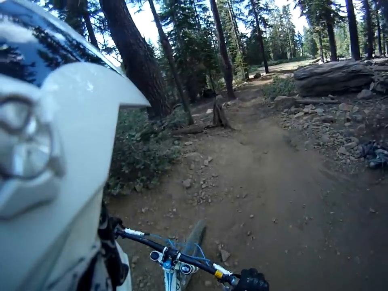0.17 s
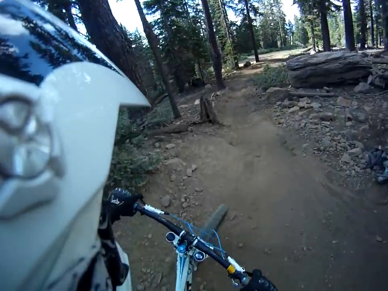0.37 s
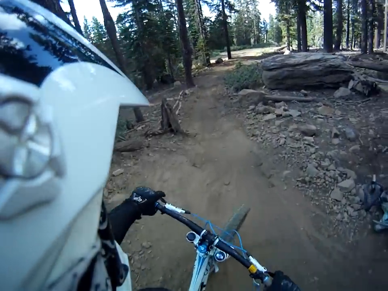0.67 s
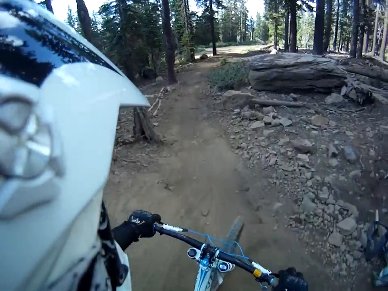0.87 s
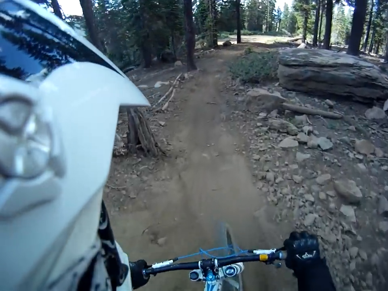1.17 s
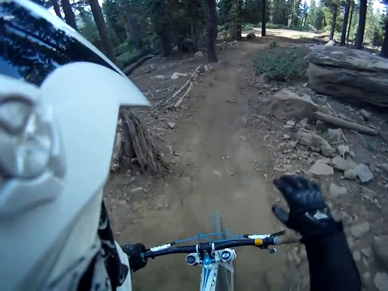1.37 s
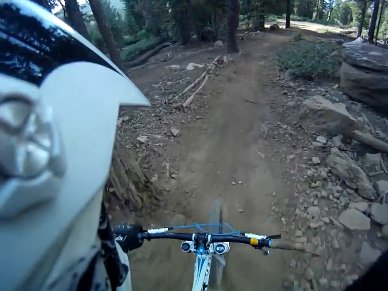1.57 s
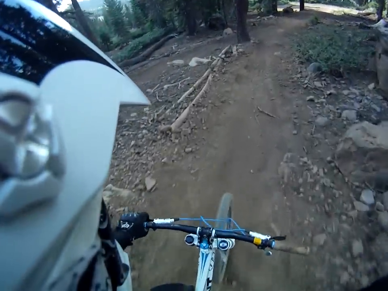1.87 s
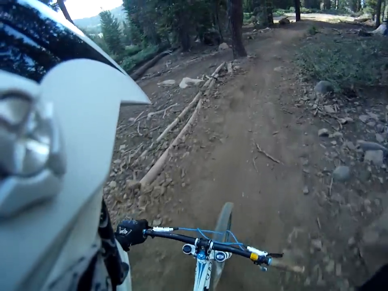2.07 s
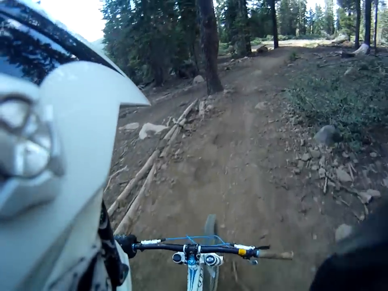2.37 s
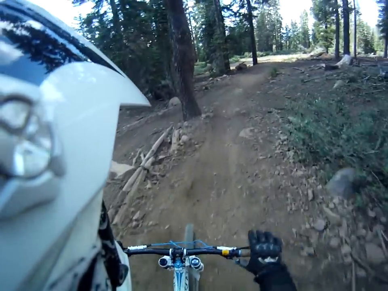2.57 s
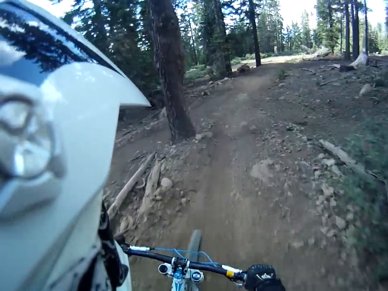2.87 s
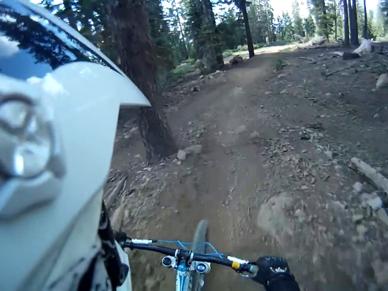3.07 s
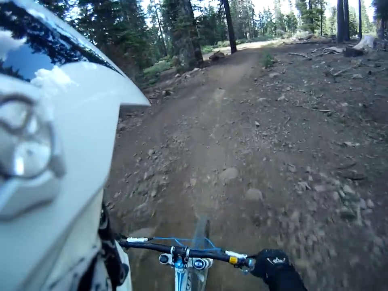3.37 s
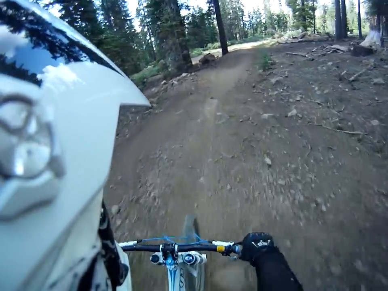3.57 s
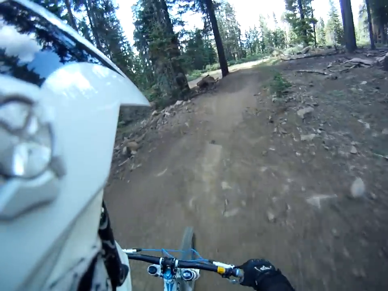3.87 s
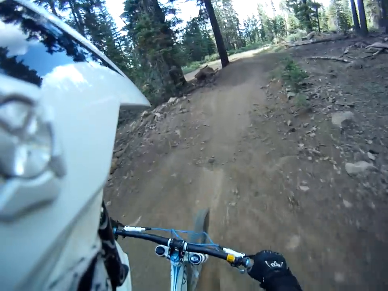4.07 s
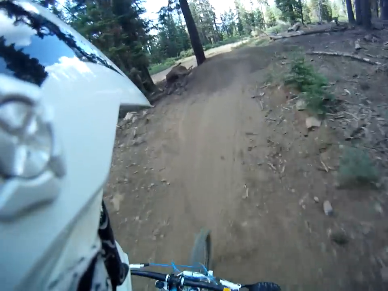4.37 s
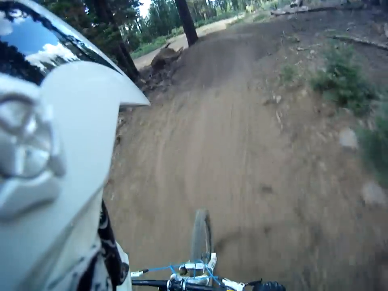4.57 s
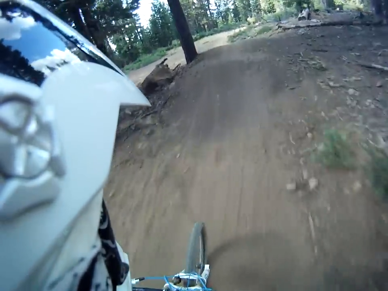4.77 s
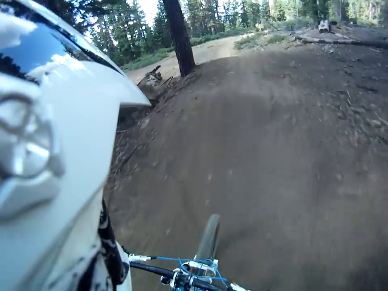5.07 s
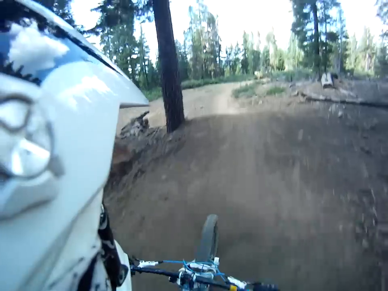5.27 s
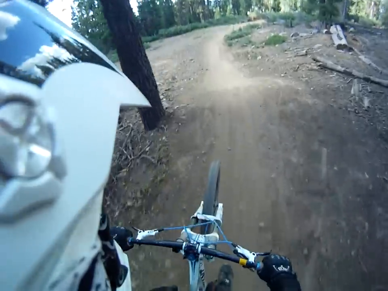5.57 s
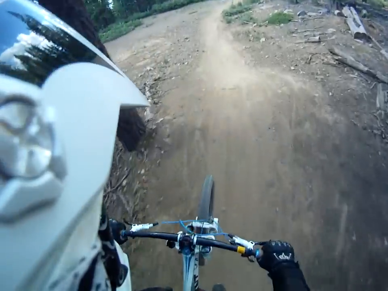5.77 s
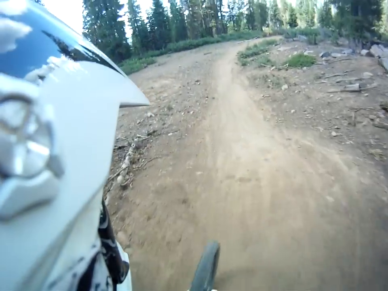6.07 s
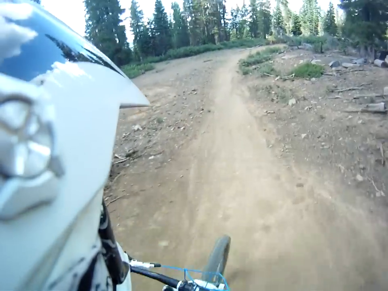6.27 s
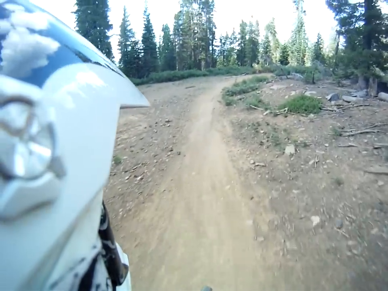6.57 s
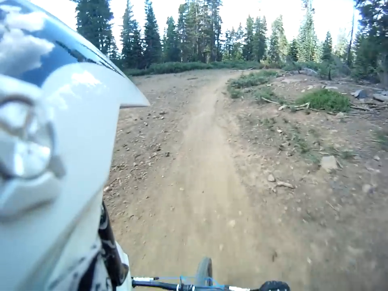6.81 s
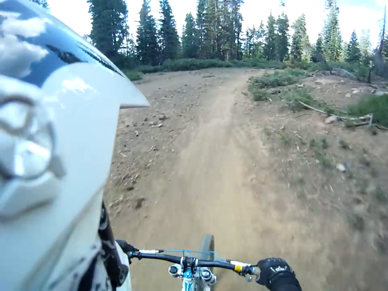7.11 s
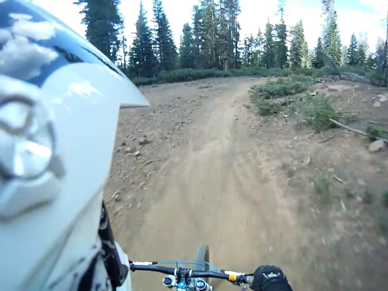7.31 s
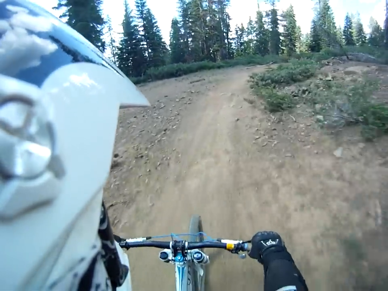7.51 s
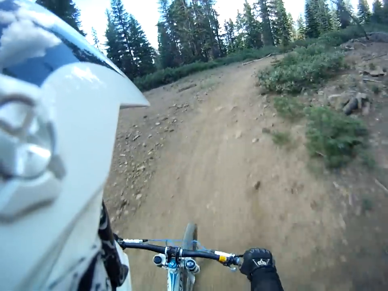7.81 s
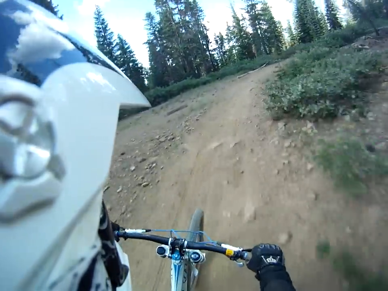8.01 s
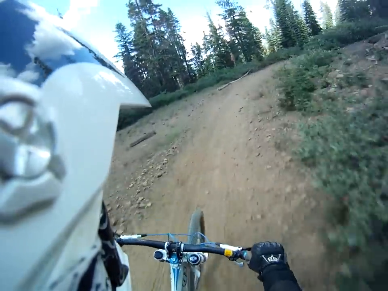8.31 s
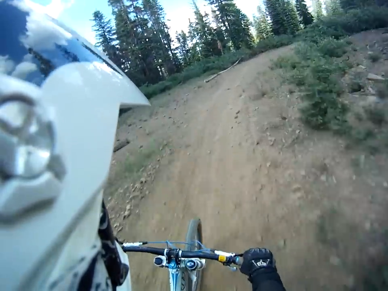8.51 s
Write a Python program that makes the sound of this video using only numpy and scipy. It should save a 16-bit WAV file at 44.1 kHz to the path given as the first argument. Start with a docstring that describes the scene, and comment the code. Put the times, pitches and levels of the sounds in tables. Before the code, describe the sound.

A mountain bike coasts quietly on dirt, heard through a closed plastic housing on the rider's helmet. Its freewheel clicks rapidly until about 1.8 seconds. At 1.7 seconds a gloved hand taps the housing, then hits it with a sharp slap at 1.8, the loudest sound. The fabric scrapes unevenly across it with low thumps and lets go with a quick clatter of knocks around 2.4 seconds.

From 2.5 seconds the bike gathers speed. Gritty, boxy tyre roll and hissing, whistling wind build, well below the slap in level, while the mount rumbles and hums on bumps. Small parts tick and knock here and there from about 3.5 to 7.5 seconds. Wind and tyres surge over loose gravel and are strongest from around 6.7 to 8 seconds. A low bump comes near 8.2 seconds, and the rolling continues to the end.

```python
"""Mountain bike from the helmet.

Dirt and gravel, gathering speed, heard from a camera in a closed plastic housing on the rider's helmet.
Tyre roll and wind reach the microphone through the housing; the mount sways and hums on bumps.
Right at the microphone a gloved hand taps and slaps the housing, wipes across it and lets go.
Down on the bike the freewheel clicks early on, and small parts rattle as the pace picks up."""
import sys
import numpy as np
from scipy import signal
from scipy.fft import rfft, irfft, next_fast_len
from scipy.io import wavfile
from scipy.ndimage import uniform_filter1d

SR = 44100
rng = np.random.default_rng(int(sys.argv[2]) if len(sys.argv) > 2 else 0)


def transcribe(signal):
    """Save signal, clipped to [-1, 1], as a 16-bit WAV file at the path in sys.argv[1]."""
    frames = np.atleast_2d(signal).T
    limited = np.clip(frames, -1, 1)
    pcm = np.round(limited * 32767).astype(np.int16)
    wavfile.write(sys.argv[1], SR, pcm)


N = 381465

# coasting slowly, then rolling fast: (time [s], tyre roll [dB], wind whistle [dB], wind hiss [dB])
COASTING = [(0.0, -72, -86, -75), (0.248, -70, -66, -66), (0.39, -70, -79, -70.5), (0.69, -70, -70, -68.5),
            (0.998, -66.5, -84, -73), (1.288, -61.5, -70, -73), (1.63, -63, -74, -65.5)]
ROLLING = [(2.5, -58, -64, -58), (2.7, -53, -57, -55.5), (2.86, -52.5, -55, -55), (3.24, -52.5, -56, -56),
           (3.54, -51, -56.5, -53), (3.9, -47.5, -49, -51), (4.23, -48, -53, -52.5),
           (4.47, -46.5, -49.5, -48), (4.59, -48, -53, -49.5), (4.76, -47.5, -56.5, -52.5),
           (5.05, -48, -54, -52), (5.22, -50, -60.5, -56.5), (5.84, -49, -59, -57),
           (6.08, -52, -57.5, -55.5), (6.23, -51, -58, -55), (6.39, -52, -60.5, -54),
           (6.56, -47.5, -50, -54), (6.73, -47.5, -45, -49), (6.85, -49, -47.5, -47.5),
           (7.0, -47.5, -47, -46), (7.16, -45, -45, -47.5), (7.45, -44.5, -41.5, -44),
           (7.79, -43, -46, -44.5), (8.0, -45, -44.5, -45), (8.2, -46, -48.5, -50), (8.65, -46, -50, -46.5)]


def ride():
    """Tyre roll and wind share the jolts of the trail and swell together over loose gravel."""
    # patches of gravel: (peak time [s], relative level [dB], dying time [s])
    gravel_patches = [(3.37, 2, 0.022), (3.53, 3, 0.033), (3.61, 4.5, 0.016), (3.68, -5, 0.016),
                      (3.72, -1, 0.036), (3.81, 2.5, 0.017), (3.99, 1, 0.033), (4.38, -3, .04),
                      (4.28, 2.5, 0.015), (4.45, -3, .03), (4.58, 1, .03), (4.8, -1, .04), (5.04, -9, .02),
                      (5.43, 2.5, 0.056), (5.75, -5, .02), (6.12, 6, 0.11), (6.222, 4.5, .03),
                      (6.35, -5, 0.018), (6.512, 2, 0.039), (6.57, 0, .02), (6.68, 5.5, .04),
                      (6.76, 5.5, 0.019), (6.99, 6, 0.068), (7.1, 0, 0.031), (7.2, -5, .03),
                      (7.28, -2, 0.021), (7.42, -8, 0.021), (7.49, 1.5, 0.044), (7.58, -10, 0.025),
                      (7.69, 2, 0.018), (7.78, -1, 0.033), (7.95, -3, 0.017), (8.17, 2, 0.021),
                      (8.38, 0, .05)]
    roll_db, whistle_db, hiss_db = curves(COASTING + ROLLING)
    jolt = 1.7 * wobble(14) + 0.82 * wobble(45)
    crunch = np.sqrt(1 + swells(gravel_patches, rise_s=0.021, tail=0.66))
    return tyre_roll(roll_db, jolt, crunch) + wind(whistle_db, hiss_db, jolt, crunch)


def tyre_roll(roll_db, jolt, crunch):
    """Tyres on dirt, a rider's height below: gritty noise in the housing's low modes, over a rumble."""
    # housing modes under tyre roll: (frequency [Hz], width [Hz], level [dB])
    roll_modes = [(313.5, 44, -9), (672, 104, -2), (959, 70, -6)]
    # rumble spectrum: (frequency [Hz], density [dB])
    rumble_spectrum = [(29, -7.5), (50, -14), (64, -11), (86, -10), (113, -18), (318, -22.5), (500, -28.5),
                       (650, -42), (1100, -120)]
    roll = filtered(gritty(grit=1.0, rate=38), modes(roll_modes, steep=1.146))
    roll *= amp(0.38 * jolt + 0.95 * wobble(25))
    rumble = coloured_noise(N, shape(rumble_spectrum))
    return amp(roll_db) * crunch ** 0.44 * unit(roll) + amp(0.55 * roll_db - 28) * rumble


def wind(whistle_db, hiss_db, jolt, crunch):
    """Air rushing over the housing: a whistle, and a hiss with mid resonances and a treble sizzle."""
    # peaks of the whistle and the hiss: (frequency [Hz], width [Hz], level [dB])
    whistle_peak = [(1658, 360, 0)]
    hiss_peaks = [(2456, 570, -0.5), (2675, 330, -4), (3660, 500, -15.5), (4850, 250, -21.5),
                  (7100, 420, -24.5), (8300, 370, -19), (9450, 770, -11), (10400, 960, -16)]
    whistle = filtered(gritty(grit=0.76, rate=55), modes(whistle_peak, steep=1.54))
    whistle *= amp(1.15 * jolt + 0.24 * wobble(25))
    hiss = filtered(patchy(gritty(grit=0.78, rate=71), depth_db=1.5), modes(hiss_peaks, steep=1.95))
    hiss *= amp(0.56 * jolt)
    return amp(whistle_db) * crunch ** 1.1 * unit(whistle) + amp(hiss_db) * crunch ** 1.26 * unit(hiss)


def mount():
    """Two low modes of helmet and mount, each a drifting tone plus noise, swelling on bumps."""
    # bumps that swing the helmet, jolts that set the mount humming:
    # (peak time [s], level [dB], dying time [s])
    sway_bumps = [(.04, -47.5, 0.05), (.21, -41, .06), (.41, -49, .08), (.55, -48, 0.054),
                  (.81, -39.5, 0.056), (1.05, -54, 0.077), (1.14, -46, .06), (1.28, -45, 0.096),
                  (1.45, -49, 0.083), (1.61, -51, 0.053), (1.82, -28, 0.076), (1.95, -28.5, 0.071),
                  (2.07, -29, 0.022), (2.19, -32.5, 0.043), (2.38, -27.5, 0.064), (2.58, -39.5, 0.068),
                  (2.8, -39, 0.033), (2.91, -43, 0.13), (3.08, -40.5, 0.14), (3.23, -34, 0.072),
                  (3.36, -42, .05), (3.48, -34.5, 0.086), (3.63, -33, 0.09), (3.79, -33.5, .05),
                  (3.9, -33.5, 0.054), (4.02, -39, .06), (4.17, -35, 0.077), (4.41, -37.5, 0.076),
                  (4.56, -41, .07), (4.7, -35, .06), (4.82, -41, 0.036), (5.06, -45, 0.051),
                  (5.23, -35.5, .06), (5.38, -37.5, .05), (5.49, -30.5, 0.05), (6.16, -35, 0.12),
                  (6.29, -35.5, 0.13), (6.5, -47, .08), (6.82, -46, .08), (7.01, -49, 0.09),
                  (7.28, -37, 0.096), (7.39, -38, 0.12), (7.64, -38, 0.071), (7.86, -33, .05),
                  (7.97, -33, .05), (8.17, -23.5, 0.038), (8.34, -35, 0.067), (8.48, -33, 0.093),
                  (8.64, -37, .06)]
    hum_jolts = [(1.28, -61, 0.045), (1.47, -60, 0.07), (1.675, -43.5, 0.091), (1.8, -30, .03),
                 (2.03, -34.5, 0.026), (2.19, -52, .04), (2.26, -41.5, .04), (2.38, -26.5, 0.052),
                 (2.46, -35, 0.12), (2.82, -54, 0.088), (3.12, -54, .1), (3.37, -56, .08),
                 (3.52, -48.5, 0.036), (3.68, -60, .1), (3.93, -52, 0.092), (4.17, -54, 0.092),
                 (4.43, -47, .05), (4.6, -48, 0.11), (4.75, -49, 0.055), (5.06, -48.5, .08),
                 (5.23, -51, 0.054), (5.35, -53.5, 0.25), (5.61, -45.5, 0.24), (5.76, -51, .1),
                 (5.88, -47, 0.035), (6.07, -60, .04), (6.19, -49, 0.049), (6.55, -51.5, 0.046),
                 (6.82, -46.5, 0.029), (6.96, -45, 0.031), (7.13, -49.5, .05), (7.39, -52, 0.18),
                 (7.85, -55, .05), (7.95, -52, .04), (8.07, -44.5, 0.045), (8.22, -51, .06),
                 (8.43, -57, 0.047), (8.55, -53, .1)]
    sway = np.sin(2 * np.pi * np.cumsum(33 + 5 * wobble(14)) / SR)
    sway += 0.27 * coloured_noise(N, modes([(29.2, 11.4, 0)], steep=1.85))
    hum = np.sin(2 * np.pi * np.cumsum(79 + 3 * wobble(12)) / SR)
    hum += 0.24 * coloured_noise(N, modes([(76, 32, 0)], steep=2.2))
    roll_db = curves(COASTING + ROLLING)[0]  # between bumps both follow the tyre roll
    sway_gain = np.sqrt(swells(sway_bumps, rise_s=0.047, tail=1.44) + amp(0.16 * roll_db - 45) ** 2)
    hum_gain = np.sqrt(swells(hum_jolts, rise_s=0.02, tail=1) + amp(roll_db - 13.5) ** 2)
    return sway_gain * unit(sway) + hum_gain * unit(hum)


def glove_taps():
    """Each blow holds at full strength for a moment, then dies away: a broad crack over the shell's modes."""
    # taps and slaps: (time [s], level [dB], hold [s], t60 [s], relative shell ring [dB])
    blows = [(1.6597, -14.5, 0.00081, 0.029, -12.5), (1.8010, -2.5, 0.0026, 0.008, 0.5),
             (2.422, -17, .0005, 0.043, -15), (2.4438, -12.5, 0.0011, 0.017, -16),
             (2.448, -21.5, 0.00073, 0.014, -7)]
    # modes of the struck shell and spectrum of the crack: (frequency [Hz], level [dB])
    shell_modes = [(610, -18), (725, 2), (880, -2.5), (1960, -9)]
    crack_spectrum = [(760, 3.5), (1300, 4), (1910, 2), (2650, 0), (3340, -1.5), (4400, -14.5), (5170, -26),
                      (5850, -31), (6930, -33), (8360, -8), (10900, -10), (14200, -50), (22000, -120)]
    out, t = np.zeros(N), np.arange(SR // 10) / SR
    shell = sum(amp(db) * np.sin(2 * np.pi * hz * t) for hz, db in shell_modes)
    for s, db, hold, t60, shell_db in blows:
        envelope = amp(db - 60 * np.maximum(t - hold, 0) / t60) * (1 - np.exp(-t / 0.0006))
        crack = coloured_noise(len(t), shape(crack_spectrum))
        add(out, s, envelope * (amp(-5.5) * crack + amp(shell_db) * shell))
    # the blows carry little below 350 Hz
    return signal.sosfilt(signal.butter(2, 350, "high", fs=SR, output="sos"), out)


def glove_wipe():
    """Fabric drags over the shell in dense, uneven slips, right at the microphone."""
    # two strokes and the pull off the shell: (time [s], scrape [dB], fizz [dB], shell [dB], thrum [dB])
    strokes = [(1.781, -80, -85, -75, -75), (1.787, -43, -52, -38, -40), (1.797, -33, -38, -40, -48),
               (1.806, -38, -44, -35, -38), (1.815, -37, -46, -51, -34), (1.833, -44.5, -49, -43, -47),
               (1.9, -41, -43, -50, -55), (1.97, -40.5, -45.5, -45.5, -53),
               (2.01, -38.5, -43.5, -45.5, -55), (2.035, -28, -36.5, -34.5, -52),
               (2.065, -35, -40, -39, -55), (2.1, -36.5, -43.5, -52, -58), (2.195, -35, -38.5, -41, -55),
               (2.24, -40, -44.5, -42.5, -55), (2.259, -45.5, -57, -52, -71),
               (2.297, -37.5, -38.5, -41.5, -41), (2.339, -37, -38.5, -36, -44),
               (2.362, -38.5, -43, -43.5, -47), (2.407, -30.5, -38, -29, -40), (2.433, -34, -42, -37, -32),
               (2.449, -27, -40, -30, -33), (2.468, -80, -64, -52, -46)]
    # spectra of the scrape and its treble fizz: (frequency [Hz], density [dB])
    scrape_spectrum = [(710, -36), (1200, -13), (1560, -11), (1750, -8), (2360, -1), (2580, -9.5),
                       (3030, -4.5), (3470, -26), (3800, -42), (4940, -52), (8360, -120)]
    fizz_spectrum = [(2120, -8), (3600, 2), (4500, -1.5), (4980, -3.5), (6080, -17), (6900, -7),
                     (8420, -3.5), (9330, 2.5), (10000, -2.5), (10900, -22), (14200, -51), (22000, -120)]
    scrape_db, fizz_db, shell_db, thrum_db = curves(strokes, edge=-120)
    slips = patchy(gritty(grit=0.61, rate=79), depth_db=2.5)
    scrape = filtered(slips, shape(scrape_spectrum))
    fizz = filtered(slips, shape(fizz_spectrum))
    shell = filtered(slips, modes([(636, 400, -1.5), (956, 160, -4.5)], steep=3.6))
    thrum = filtered(slips, modes([(125, 69, 1), (254, 66, -3)], steep=1.5))
    return (amp(scrape_db) * unit(scrape) + amp(fizz_db) * unit(fizz)
            + amp(shell_db) * unit(shell) + amp(thrum_db) * unit(thrum))


def glove_shoves():
    """The hand pushes the whole housing: a pressure bump between two dips."""
    # pushes: (time [s], peak [dB], half length of the bump [s])
    pushes = [(1.6608, -26, 0.00068), (1.805, -14, 0.0078), (2.008, -23, 0.0032), (2.439, -15.5, 0.0029)]
    out, t = np.zeros(N), np.arange(N) / SR
    for s, db, half in pushes:
        offset = (t - s) / half
        out += amp(db) * (1 - offset ** 2) * np.exp(-0.5 * offset ** 2)
    return out


def rattles():
    """Loose parts tick brightly; short knocks come through the mount, each ringing one mode."""
    # loose parts: (time [s], relative level [dB], t60 [s])
    part_ticks = [(4.5256, -40, 0.04), (4.6848, -39, 0.043), (4.7287, -42, 0.043), (4.804, -47, 0.04),
                  (5.4365, -32, 0.044), (5.5987, -32, 0.024), (6.1345, -30, 0.045), (6.1494, -43, 0.04),
                  (6.2327, -39, 0.068), (6.2632, -43, 0.05), (6.2794, -43, 0.071), (6.4373, -41, 0.04),
                  (6.6782, -45, 0.07), (6.8379, -48.5, 0.04), (6.9894, -45, 0.07)]
    # spectrum of a tick: (frequency [Hz], density [dB])
    tick_spectrum = [(2000, -20), (3200, 1.5), (5000, -0.5), (6000, -5), (7200, -1.5), (9000, -10),
                     (11000, -18)]
    # knocks: (time [s], relative level [dB], pitch [Hz])
    mount_knocks = [(0.244, -40, 930), (.273, -40, 775), (0.553, -39, 290), (.699, -42.5, 980),
                    (1.597, -38, 946), (3.609, -28.5, 1635), (3.71, -33, 1670), (3.968, -42, 1500),
                    (4.349, -26.5, 690), (4.554, -33, 960), (6.222, -27.5, 2680), (6.742, -25, 2680),
                    (6.838, -36, 2550), (6.88, -25, 2560), (6.986, -24, 1690), (7.002, -16.5, 1694),
                    (7.099, -23, 1700), (7.5, -19, 1670)]
    out, t = np.zeros(N), np.arange(SR // 20) / SR
    for s, db, t60 in part_ticks:
        tick = coloured_noise(len(t), shape(tick_spectrum))
        add(out, s, amp(db - 10.5) * struck(t, rise_s=0.0007, t60=t60) * tick)
    for s, db, hz in mount_knocks:
        add(out, s, amp(db - 3.5) * struck(t, rise_s=0.0018, t60=0.038) * np.sin(2 * np.pi * hz * t))
    return out


def freewheel():
    """Each pawl click from the rear hub is a ring near 2.3 or 2.7 kHz with a bright puff of noise."""
    # ratchet while coasting: (time [s], click rate [1/s], level [dB])
    ratchet = [(0, 24.2, -57), (.75, 22.6, -54), (1.15, 23, -56.5), (1.36, 36, -50.5), (1.65, 30, -58),
               (1.78, 42, -52)]
    # peaks of a click: (frequency [Hz], width [Hz], level [dB])
    click_peaks = [(2365, 96, 2), (2680, 160, -6), (3760, 250, -15.5), (4930, 310, -18.5), (7800, 390, -22),
                   (9480, 450, -14.5)]
    out, t = np.zeros(N), np.arange(SR // 20) / SR
    envelope = struck(t, rise_s=0.0027, t60=0.076)
    rate, level_db = curves(ratchet)
    teeth_passed = np.cumsum(rate[:round(ratchet[-1][0] * SR)]) / SR
    for i in np.flatnonzero(np.diff(teeth_passed // 1)):
        late, softer, which_ring, detune = rng.standard_normal(4)
        hz = (2670 if which_ring > 0.6 else 2340) + 40 * detune
        puff = coloured_noise(len(t), modes(click_peaks, steep=1.26))
        click = envelope * (0.83 * np.sin(2 * np.pi * hz * t) + 0.99 * puff)
        add(out, abs(i / SR + 0.11 * late / rate[i]), amp(level_db[i] - 0.5 * softer) * click)
    return out


def noise_floor():
    """Microphone noise and far air: a faint steady hiss under everything."""
    # spectrum of the hiss: (frequency [Hz], density [dB])
    floor_spectrum = [(29, -41), (50, -7.5), (113, -10.5), (668, -19.5), (1250, -25), (2110, -26),
                      (2410, -36), (3160, -28), (4960, -34.5), (5940, -37), (6800, -35), (9540, -38),
                      (10900, -50), (14200, -81), (22000, -120)]
    return amp(-62) * coloured_noise(N, shape(floor_spectrum))


def amp(db):
    """Gain of a level in dB."""
    return 10 ** (np.asarray(db) / 20)


def unit(x):
    """Scaled to rms 1."""
    return x / np.sqrt(np.mean(x ** 2) + 1e-20)


def curves(rows, edge=None):
    """One value per sample for each column after the time."""
    s, *cols = np.transpose(rows)
    return [np.interp(np.arange(N) / SR, s, c, edge, edge) for c in cols]


def wobble(rate):
    """A random curve, rate knots a second."""
    return np.interp(np.arange(N) * rate / SR, np.arange(2000), rng.standard_normal(2000))


def struck(t, rise_s, t60):
    """A quick rise, dying by 60 dB in t60 seconds."""
    return amp(-60 * t / t60) * (1 - np.exp(-t / rise_s))


def swells(rows, rise_s, tail):
    """Power of bumps that build to a peak and die away: tail 1 rings out, tail 2 is damped quickly."""
    t = np.arange(N) / SR
    power = np.zeros(N)
    for s, db, fall in rows:
        drop = np.where(t < s, ((t - s) / rise_s) ** 2, (abs(t - s) / fall) ** tail)
        power += amp(2 * db) * np.exp(-2 * drop)
    return power


def filtered(x, response):
    """x through a frequency response."""
    m = next_fast_len(len(x) + 8192)
    return irfft(rfft(x, m) * response(np.fft.rfftfreq(m, 1 / SR)), m)[:len(x)]


def shape(points):
    """Response through (Hz, dB) points on a log axis."""
    f, db = np.transpose(points)
    return lambda hz: amp(np.interp(np.log(hz + 1), np.log(f), db, -120, -120))


def modes(table, steep):
    """Peaks (Hz, width Hz, dB) adding in power; steep deepens the valleys."""
    return lambda f: np.sqrt(sum(amp(2 * db) / (1 + ((f * f - c * c) / (f * w + 1)) ** 2) ** steep
                                 for c, w, db in table))


def coloured_noise(n, response):
    """n samples of filtered noise at rms 1."""
    return unit(filtered(rng.standard_normal(n), response))


def gritty(grit, rate):
    """White noise with short stronger bursts, rate a second."""
    grains = (rng.random(N) < rate / SR) * rng.random(N)
    return rng.standard_normal(N) * (1 + grit * signal.oaconvolve(grains, np.hanning(400), "same"))


def patchy(x, depth_db):
    """Random patches of gain across time and frequency."""
    spectra = signal.stft(x, nperseg=256)[2]
    field = uniform_filter1d(rng.standard_normal(spectra.shape), size=3, axis=0)
    field = uniform_filter1d(field, size=8, axis=1)
    return signal.istft(spectra * amp(depth_db * unit(field)), nperseg=256)[1][:N]


def add(track, s, sound):
    """Mixes a sound into the track at s seconds."""
    part = track[round(s * SR):][:len(sound)]
    part += sound[:len(part)]


def scene():
    """Everything arrives through the housing at one microphone on the helmet."""
    trail = ride() + noise_floor() + mount()
    glove = glove_wipe() + glove_taps() + glove_shoves()
    return (trail + glove + freewheel() + rattles())[None]


def record(dry):
    """The microphone has dead spots, the hardest slap clips, and the camera cuts the top treble."""
    # dead spots of the microphone: (frequency [Hz], width [Hz], gain [dB])
    dead_spots = [(6000, 342, -16), (7600, 130, -3), (10740, 90, -29)]
    top_hz = 11120
    notched = filtered(dry[0],
                      lambda hz: amp(sum(db * np.exp(-((hz - c) / w) ** 2) for c, w, db in dead_spots)))
    clipped = notched / (1 + np.abs(notched) ** 8) ** (1 / 8)
    return filtered(clipped, lambda hz: 1 / (1 + np.exp(np.clip((hz - top_hz) / 25, -50, 50))))[None]


dry = scene()
out = record(dry)
transcribe(out)
```